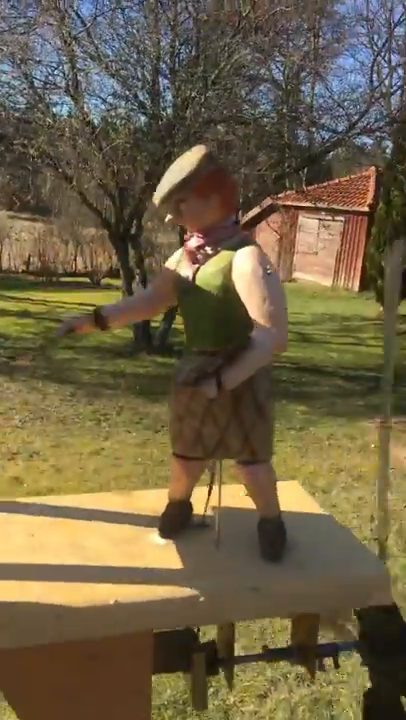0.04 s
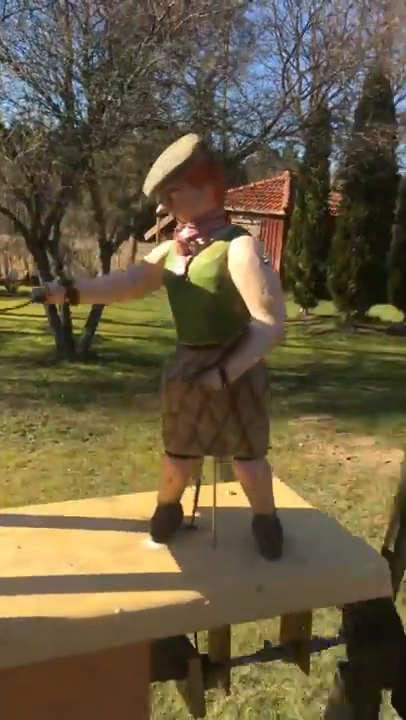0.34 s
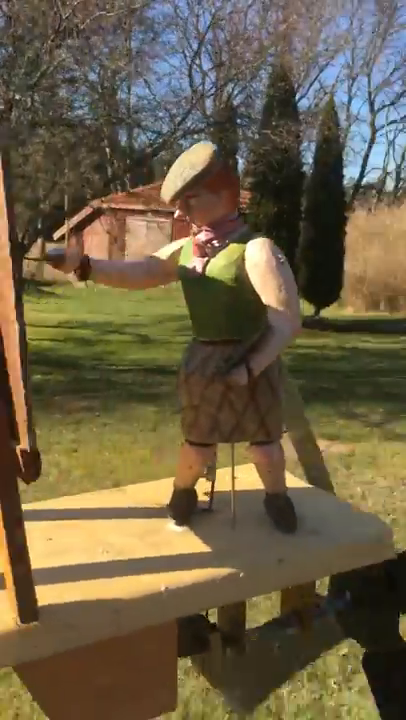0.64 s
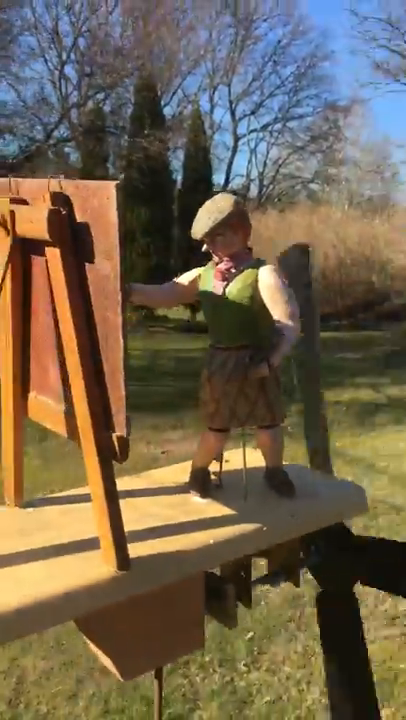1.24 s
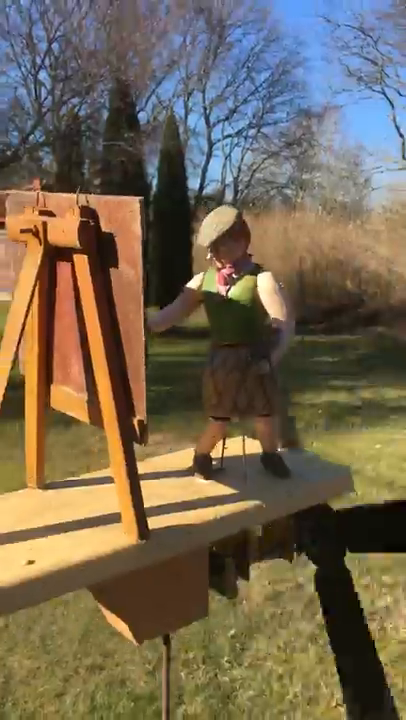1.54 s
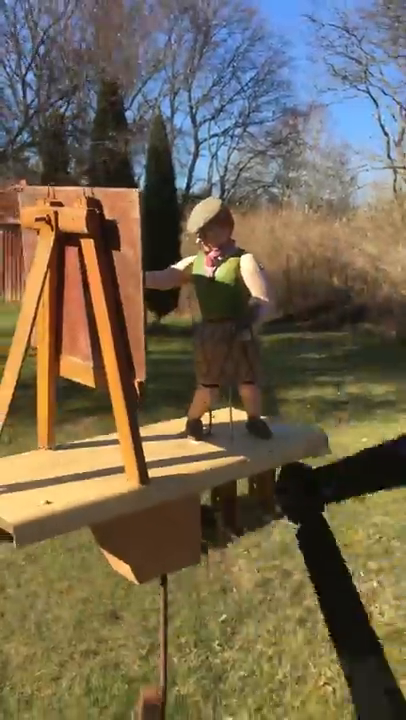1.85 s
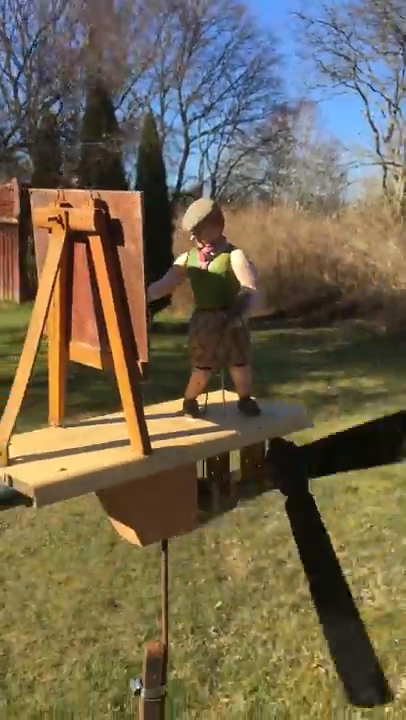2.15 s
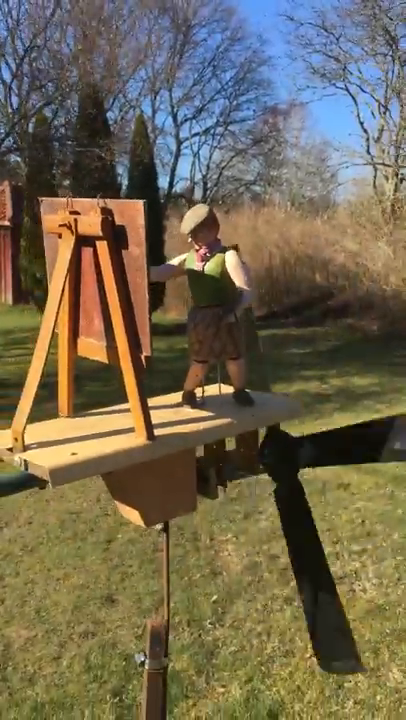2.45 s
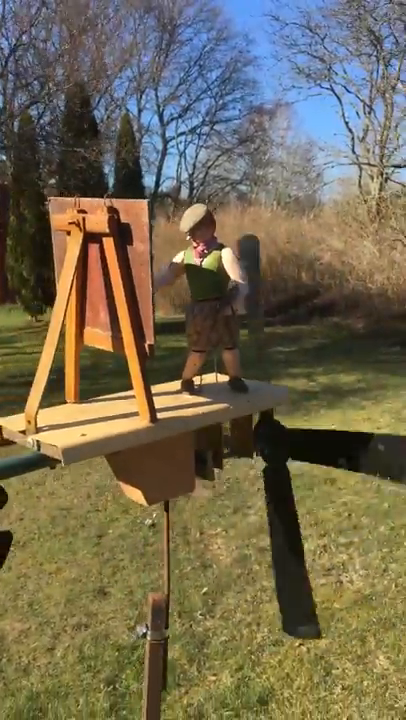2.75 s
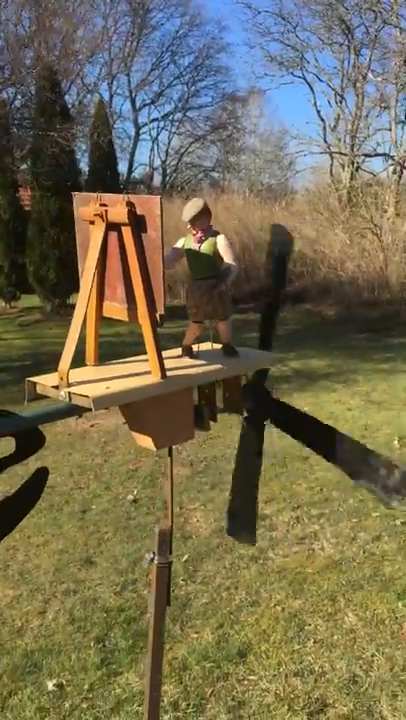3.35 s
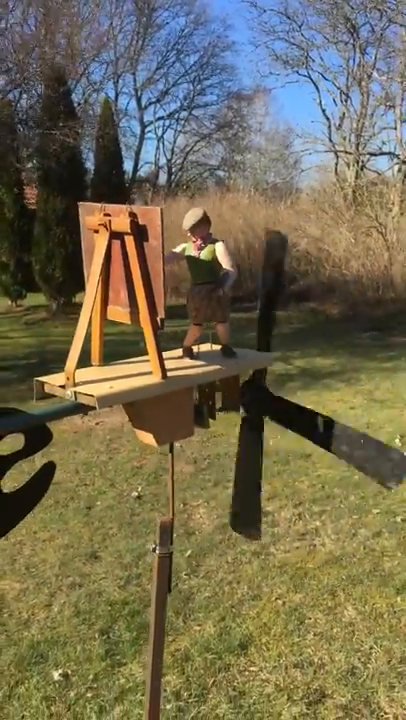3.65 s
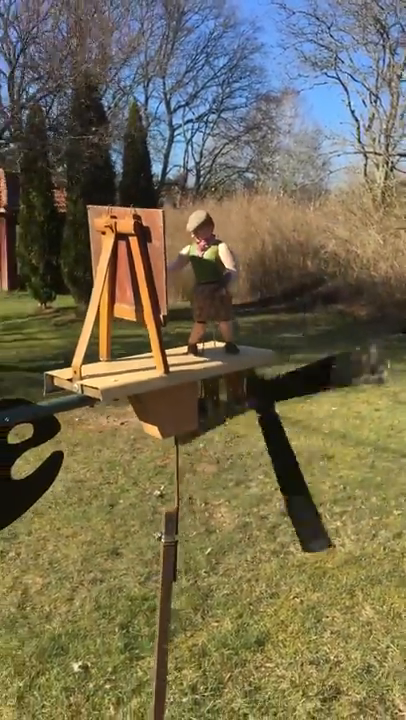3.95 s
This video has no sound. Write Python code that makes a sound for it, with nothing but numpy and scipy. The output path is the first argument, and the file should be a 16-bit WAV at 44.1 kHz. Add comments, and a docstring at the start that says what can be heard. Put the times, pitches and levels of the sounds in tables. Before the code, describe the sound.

A wooden whirligig turns close by with uneven knocks, sharp clicks and a faint squeak and creak on each turn, slowing a little. Wind rumbles on the microphone in a quiet garden and buffets it hard near the end.

```python
"""Knocks, squeaks and sharp clicks come from a wooden garden whirligig, close by, slowing a little.
As the wind turns it, its crank knocks, its axle squeaks and a linkage sticks and slips with a creak.
Its wire push rod snaps, which sets the rod and the wooden platform ringing.
Wind rumbles on the microphone and buffets it hard near the end, over the hush of a quiet garden."""
import sys
import numpy as np
from scipy import signal
from scipy.io import wavfile
from scipy.ndimage import uniform_filter1d

SR = 44100
rng = np.random.default_rng(int(sys.argv[2]) if len(sys.argv) > 2 else 0)


def output_pcm(signal):
    """Save a mono or channel-first signal as 16-bit PCM at the path in sys.argv[1].

    Samples are clipped to [-1, 1] before scaling.
    """
    pcm = np.clip(np.atleast_2d(signal).T, -1, 1) * 32767
    wavfile.write(sys.argv[1], SR, np.round(pcm).astype(np.int16))


N = 176400
T = np.arange(N) / SR


def from_db(db):
    """Turn decibels into a number to multiply a sound by."""
    return 10 ** (np.asarray(db) / 20)


def band_pass(x, edges_hz, order=2):
    """Keep the part of a sound between two frequencies."""
    return signal.sosfilt(signal.butter(order, edges_hz, "band", fs=SR, output="sos"), x)


def drift(rate_hz):
    """A smooth random wobble, about 1 in size; a higher rate wobbles faster."""
    step, warm_up = 40, 2000
    r = np.exp(-2 * np.pi * rate_hz * step / SR)
    white = rng.standard_normal(N // step + warm_up + 2)
    slow = signal.lfilter([1], [1, -2 * r, r * r], white)[warm_up:]
    slow /= np.sqrt(np.mean(slow ** 2))
    return np.interp(np.arange(N) / step, np.arange(len(slow)), slow)


def noise_bands(colour):
    """Noise in bands a third of an octave wide that add up to level 1: (centres_hz, bands)."""
    hz, db = np.transpose(colour)
    edges = 22 * 2 ** (np.arange(30) / 3)
    centres = np.sqrt(edges[1:] * edges[:-1])
    octaves_outside = np.abs(np.log2(centres / np.clip(centres, hz[0], hz[-1])))
    gains = from_db(np.interp(np.log(centres), np.log(hz), db) - 24 * octaves_outside)
    white = rng.standard_normal((2, N))
    bands = np.array([g * band_pass(white[k % 2], edges[k:k + 2]) for k, g in enumerate(gains)])
    return centres, bands / bands.sum(0).std()


def noise(colour):
    """Noise at level 1; its colour says how strong each frequency is next to the others."""
    return noise_bands(colour)[1].sum(0)


def evened(x, samples):
    """Hold a noise near level 1, averaged over about this many samples."""
    power = uniform_filter1d(uniform_filter1d(x ** 2, samples), samples)
    return x / np.sqrt(power + 1e-12)


def cluster(edges_hz):
    """Many close tones ringing together between two frequencies, at level 1."""
    return evened(band_pass(rng.standard_normal(N), edges_hz), samples=300)


def swell(middle_s, half_length_s):
    """A smooth rise and fall."""
    return np.exp(-np.minimum(((T - middle_s) / half_length_s) ** 2, 50))


def fade(start_s, fade_s):
    """A sudden start, then a fall of 60 dB in fade_s."""
    return (T >= start_s) * np.exp(-np.clip(np.log(1000) * (T - start_s) / fade_s, 0, 40))


def strike(times_s, db, tones, spread_db):
    """Blows ring an object's own tones, each time with slightly different strengths."""
    out = np.zeros(N)
    at = np.clip((times_s * SR).astype(int), 0, N - 1)
    for hz, tone_db, fade_s in tones:
        strengths = from_db(db + tone_db + rng.normal(0, spread_db, len(at)))
        blows = np.full(N, 1e-18)
        blows[at] = strengths * rng.choice([-1, 1], len(at))
        r, w = np.exp(-np.log(1000) / (fade_s * SR)), 2 * np.pi * hz / SR
        out += signal.lfilter([0, np.sin(w)], [1, -2 * r * np.cos(w), r * r], blows)
    return out


def garden_hush():
    """The quiet garden is a soft, steady noise, strongest in the bass."""
    # colour of the hush: frequency_hz, level_db
    colour = [(40, -3.5), (100, -1.5), (500, -5), (1600, -12), (2200, -18), (5000, -26), (7000, -29),
              (15500, -33.5)]
    return from_db(-53.5) * noise(colour)


def wind_rumble():
    """Wind on the microphone makes a low rumble that comes in uneven puffs."""
    # strength of the wind: time_s, level_db
    puffs = [(0, -54), (.19, -51), (.235, -38), (.35, -58), (.56, -50), (.62, -38.5), (.82, -44.5),
             (.97, -56.5), (1.13, -38), (1.27, -40), (1.33, -29), (1.39, -34.5), (1.45, -26.5),
             (1.6, -47.5), (1.66, -19.5), (1.71, -31), (1.79, -30), (1.9, -37), (2.09, -44), (2.27, -40),
             (2.48, -50), (2.515, -32.5), (2.66, -44.5), (2.71, -34), (2.79, -38.5), (2.98, -34),
             (3.03, -46), (3.18, -41), (3.28, -23.5), (3.37, -39.5), (3.5, -37), (3.57, -13.5),
             (3.655, -47.5), (3.71, -21), (3.8, -13), (3.83, -24.5), (3.9, -18.5), (3.95, -16.5),
             (4, -19.5)]
    # colour of the rumble: frequency_hz, level_db
    colour = [(25, -17), (60, 4.5), (90, 2), (150, -3.5), (250, -13), (400, -35.5), (1600, -92.5)]
    flutter_db = 4 * np.tanh(drift(rate_hz=31))
    level_db = np.interp(T, *np.transpose(puffs)) + flutter_db
    return from_db(level_db) * evened(noise(colour), samples=2000)


def wind_buffets():
    """Swirls of air hit the microphone in rough bursts that reach higher than the rumble."""
    # swirls: middle_s, length_s, level_db, upper_edge_hz
    buffets = [(1.393, 0.028, -36, 356), (1.665, 0.035, -27, 330), (2.704, 0.015, -27.5, 303),
               (2.89, 0.053, -40.5, 350), (3.289, 0.04, -29, 373), (3.566, 0.033, -20, 544),
               (3.742, 0.014, -14, 607), (3.779, 0.018, -16, 770), (3.91, 0.21, -25.5, 565),
               (3.935, 0.023, -14.5, 915), (3.965, 0.072, -23, 600)]
    lower_edge_hz = 114
    roughness = from_db(2 * drift(rate_hz=48))
    out = np.zeros(N)
    for s, length, db, edge_hz in buffets:
        swirl = band_pass(rng.standard_normal(N), [lower_edge_hz, edge_hz])
        swirl = signal.sosfilt(signal.butter(3, 1.05 * edge_hz, fs=SR, output="sos"), swirl)
        out += from_db(db) * swell(s, length * 0.51) * evened(swirl * roughness, samples=600)
    return out


def wind_pops():
    """The hardest swirls break on the microphone with one quick swing of pressure."""
    # pops: middle_s, strength_db, centre_hz
    pops = [(3.585, -8.5, 210), (3.7422, -4.5, 490), (3.78, -0.5, 297), (3.944, 1, 290)]
    out = np.zeros(N)
    for s, db, hz in pops:
        scaled_time = 2 * np.pi * hz * (T - s)
        out += from_db(db) * scaled_time / (1 + scaled_time ** 2) ** 2
    return out


def shaft_rubbing():
    """Rubbing makes faint swells of gritty hiss; scrapes of the shaft glide through them."""
    # rubs: middle_s, half_length_s, level_db
    rubs = [(1.42, 0.12, -63), (2.533, 0.043, -63.5), (2.903, 0.21, -66.5)]
    # colour of the hiss: frequency_hz, level_db
    colour = [(2500, -17.5), (4000, 6.5), (6500, 6.5), (16000, -7)]
    # scrapes: middle_s, half_length_s, level_db, pitch_hz, glide_hz_per_s
    scrapes = [(1.452, 0.034, -57, 3800, 14002), (2.977, 0.087, -61.5, 4460, -15000)]
    level = sum(from_db(db) * swell(s, half_length) for s, half_length, db in rubs)
    out = level * noise(colour) * from_db(2.5 * drift(rate_hz=120))
    rough_hz = 520 * drift(rate_hz=640)
    for s, half_length, db, hz, glide in scrapes:
        phase = 2 * np.pi * np.cumsum(hz + glide * (T - s) + rough_hz) / SR
        out += from_db(db) * swell(s, half_length) * np.sin(phase)
    return out


def axle_squeaks():
    """Once a turn the axle sings a wavering tone, with a faint one at three times the pitch."""
    # squeaks: middle_s, length_s, level_db, pitch_hz
    squeaks = [(0.13, 0.021, -50.5, 4740), (.586, 0.025, -57, 4760), (1.084, 0.032, -47, 4777),
               (1.642, 0.045, -63.5, 4770), (2.244, 0.04, -60, 4800), (2.871, 0.042, -59.5, 4790),
               (3.504, 0.034, -57.5, 4783)]
    waver_hz, overtone_db = 19, -29
    waver_cycles = np.cumsum(waver_hz * drift(rate_hz=60)) / SR
    out = np.zeros(N)
    for s, length, db, hz in squeaks:
        phase = 2 * np.pi * (hz * T + waver_cycles)
        tone = np.sin(phase) + from_db(overtone_db) * np.sin(3 * phase)
        out += np.sqrt(2) * from_db(db) * swell(s, length / 2) * tone
    return out


def linkage_creaks():
    """Once a turn the linkage sticks and slips in a short, uneven run; each slip makes it ring."""
    # creaks: start_s, length_s, level_db, relative_squeal_db
    creaks = [(0.156, 0.043, -52.5, 7), (0.62, 0.032, -56, 10.5), (1.169, 0.048, -47.5, -4),
              (1.709, 0.084, -46.5, -3.5), (2.3, .1, -49, -7), (2.962, 0.096, -52.5, -6),
              (3.605, 0.043, -52, -6)]
    # low tones of the linkage: pitch_hz, relative_db, fade_s
    low_tones = [(1196, -1.5, 0.048), (1730, -3, 0.014), (1933, -8.5, 0.034)]
    # its high squeal: pitch_hz, relative_db, fade_s
    squeal_tones = [(3250, -6, 0.024), (3720, -12, 0.01)]
    slips_per_s, jitter_s = 80, 0.00078
    slips = [(s + age, db, squeal_db) for s, length, db, squeal_db in creaks
             for age in np.arange(0, length, 1 / slips_per_s)]
    times, db, squeal_db = np.transpose(slips)
    times = times + rng.normal(0, jitter_s, len(times))
    low_ring = strike(times, db, low_tones, spread_db=3)
    squeal = strike(times, db + squeal_db, squeal_tones, spread_db=2)
    grit = from_db(2 * drift(rate_hz=400))
    return (low_ring + squeal) * grit


def dry_ticks():
    """Single tiny ticks with no ring."""
    # ticks: start_s, level_db
    ticks = [(1.1593, -35), (1.3142, -31.5), (1.356, -33)]
    spikes = np.full(N, 1e-18)
    for s, db in ticks:
        spikes[int(s * SR)] = 2 * from_db(db)
    return band_pass(spikes, edges_hz=(2490, 8950), order=1)


def crank_knocks():
    """Each knock of the crank is a short wooden note with a rattle on top."""
    # knocks: start_s, level_db, pitch_hz, relative_rattle_db
    knocks = [(0.0662, -54, 1720, 9), (0.0983, -36.5, 1530, -15), (0.3719, -55, 1540, 16),
              (0.3805, -50.5, 1630, 5), (0.407, -42, 1440, -17), (0.471, -46.5, 1540, -7),
              (0.5476, -36, 1470, -13), (0.98, -45, 1710, 0), (1.0547, -39.5, 1390, -13),
              (1.393, -44, 1610, -7), (1.5043, -34, 1690, -27), (1.9771, -46, 1460, -6),
              (2.6027, -43, 1570, -6), (3.234, -43, 1780, -11), (3.244, -41.5, 1590, -7)]
    # colour of the rattle: frequency_hz, level_db
    colour = [(700, 4), (1600, 3), (2500, -3), (3300, 7.5), (4100, 0.5), (5200, -7.5), (14000, -32)]
    rise_s = 0.00094
    rattle_noise = noise(colour)
    out = np.zeros(N)
    for s, db, hz, rattle_db in knocks:
        age = np.maximum(T - s, 0)
        note = np.sin(2 * np.pi * hz * age) * (1 - np.exp(-age / rise_s)) * fade(s, fade_s=0.019)
        rattle = from_db(rattle_db) * rattle_noise * fade(s, fade_s=0.042)
        out += from_db(db) * (2 * note + rattle)
    return out


def rod_clicks():
    """The push rod snaps brightly, pitched by its point of contact; rod and platform ring on."""
    # snaps: start_s, level_db, relative_wood_db, upper_edge_hz, contact_pitch_hz
    clicks = [(0.2881, -38.5, -11, 10400, 6300), (0.8677, -30, 13.5, 10700, 6400),
              (0.8729, -34, -1, 6650, 3350), (1.503, -44, 11, 14900, 9100),
              (1.5316, -39.5, -2, 14500, 13600), (2.014, -52, 15.5, 14000, 9700),
              (2.117, -39, 1.5, 15000, 7130), (2.636, -48, -8, 15000, 5740),
              (2.7612, -42.5, 0.5, 12500, 6970), (3.824, -37, 3.5, 9100, 3310),
              (3.988, -46, 12, 10600, 6100)]
    # colour of a snap: frequency_hz, level_db
    colour = [(500, -11), (2200, -5), (4000, -1), (7000, 1), (9300, -2), (13500, -5), (16000, -16)]
    # faint lingering tones of rod and platform: pitch_hz, relative_db
    rod_tones = [(1615, -23), (3260, -26), (3920, -25), (5530, -26), (6480, -21), (8005, -23)]
    snap_fade_s, tail_fade_s, tail_db = 0.034, 0.17, -18
    wood_base_db, contact_db, contact_spread_hz = -14, -5, 170
    damping_hz, ring_cycles = 17000, 650
    hz, bands = noise_bands(colour)
    wood = cluster(edges_hz=(1430, 1830))
    age = T[:SR // 3]
    loss = -60 * np.outer(1 + (hz / damping_hz) ** 2, age)  # the treble dies first
    decay = from_db(loss / snap_fade_s) + from_db(tail_db + loss / tail_fade_s)
    out = np.zeros(N)
    for s, db, wood_db, edge_hz, contact_hz in clicks:
        span = slice(int(s * SR), int(s * SR) + len(age))
        snap = bands[:, span]
        gains = from_db(db + rng.normal(0, 1, len(hz))) / np.sqrt(1 + (hz / edge_hz) ** 8)
        out[span] += gains @ (snap * decay[:, :snap.shape[1]])
        out += from_db(db + wood_db + wood_base_db) * wood * fade(s, fade_s=0.075)
        contact = cluster([contact_hz - contact_spread_hz, contact_hz + contact_spread_hz])
        out += from_db(db + contact_db) * contact * fade(s, snap_fade_s)
    times, levels_db = np.transpose(clicks)[:2]
    tones = [(pitch_hz, db, ring_cycles / pitch_hz) for pitch_hz, db in rod_tones]
    return out + strike(times, levels_db, tones, spread_db=3)


def scene():
    """The whirligig, the wind and the garden, added into one channel."""
    hits = rod_clicks() + crank_knocks() + dry_ticks()
    friction = axle_squeaks() + linkage_creaks() + shaft_rubbing()
    wind = wind_rumble() + wind_buffets() + wind_pops()
    return (hits + friction + wind + garden_hush())[None]


def record(dry):
    """The microphone loses the deepest bass and the highest treble, and has a narrow treble dip."""
    low_cut_hz, high_cut_hz = 19.2, 15800
    dip_hz, dip_share = 10500, 0.72
    sound = signal.sosfilt(signal.butter(2, low_cut_hz, "high", fs=SR, output="sos"), dry)
    sound -= dip_share * signal.lfilter(*signal.iirpeak(dip_hz, Q=41, fs=SR), sound)
    return signal.sosfilt(signal.ellip(10, .3, 80, high_cut_hz, fs=SR, output="sos"), sound)


dry = scene()
out = record(dry)
output_pcm(out)
```